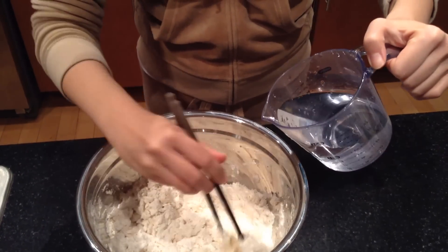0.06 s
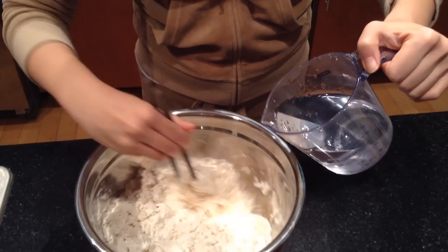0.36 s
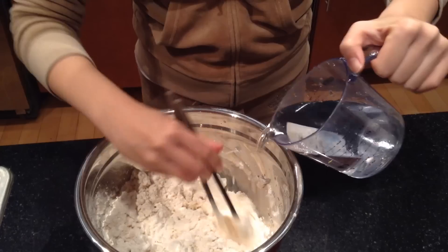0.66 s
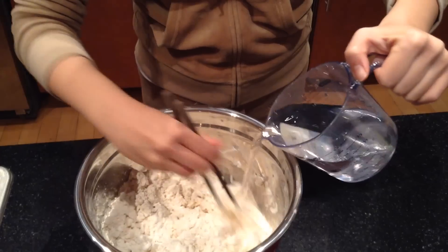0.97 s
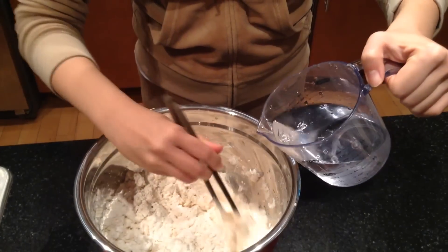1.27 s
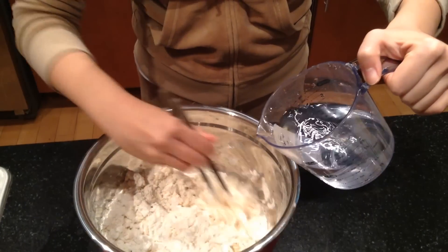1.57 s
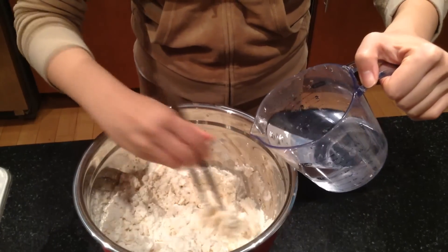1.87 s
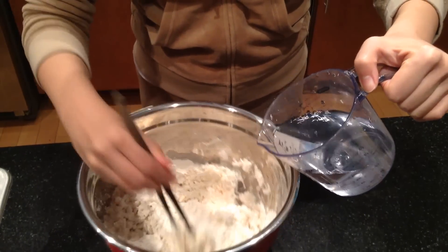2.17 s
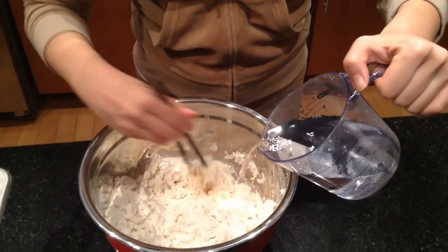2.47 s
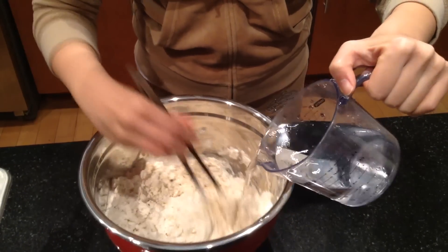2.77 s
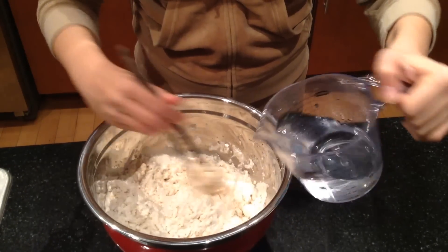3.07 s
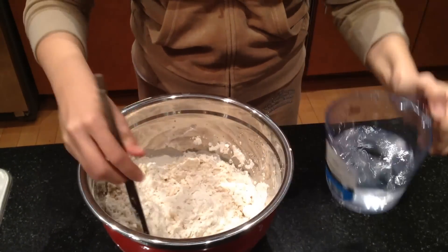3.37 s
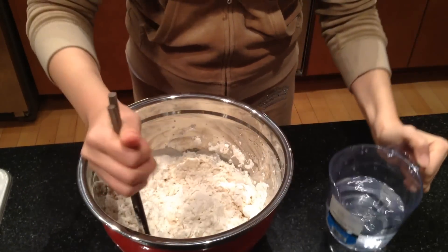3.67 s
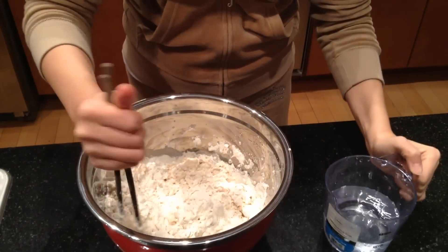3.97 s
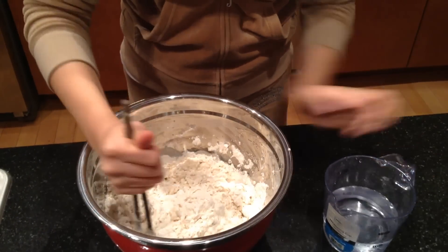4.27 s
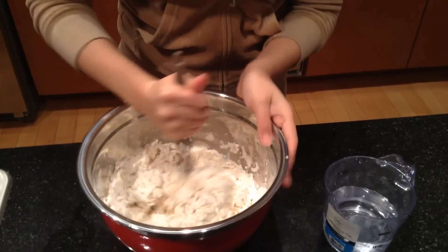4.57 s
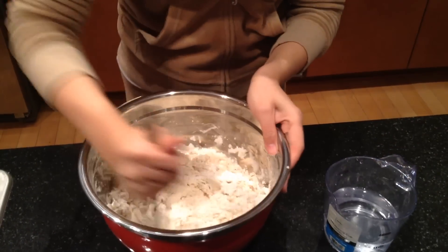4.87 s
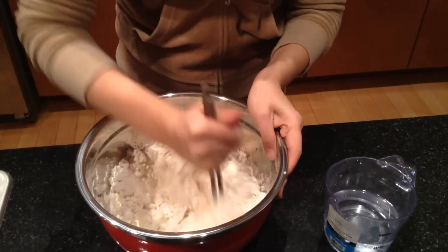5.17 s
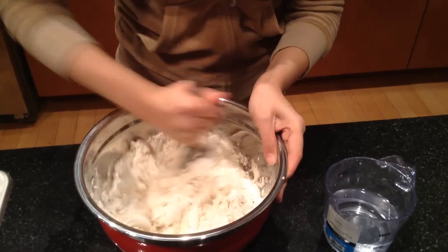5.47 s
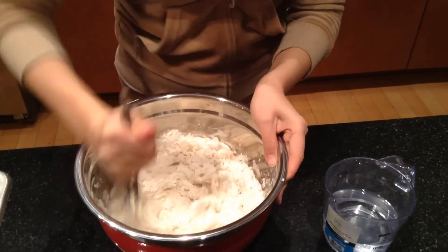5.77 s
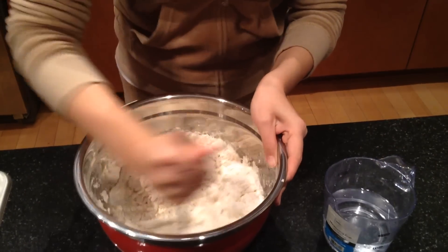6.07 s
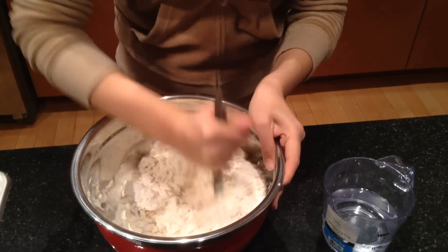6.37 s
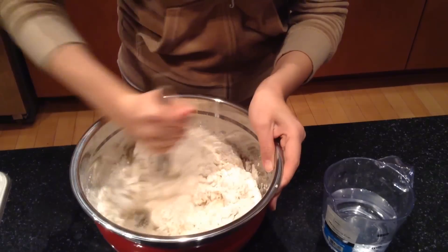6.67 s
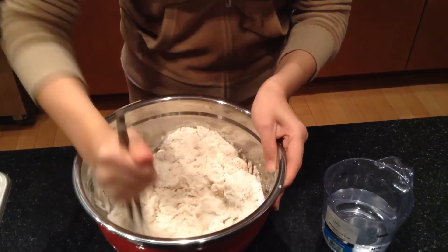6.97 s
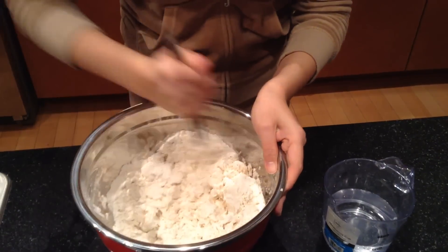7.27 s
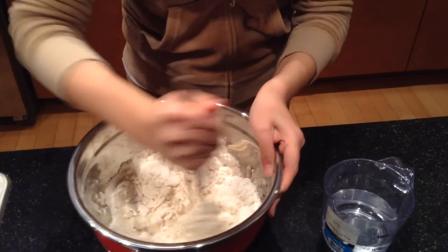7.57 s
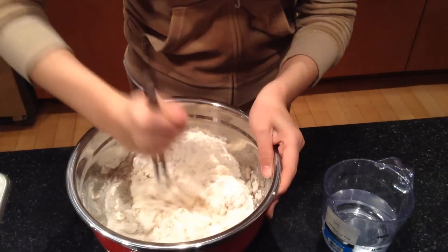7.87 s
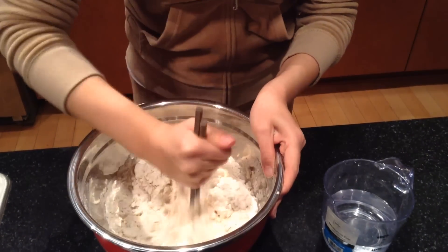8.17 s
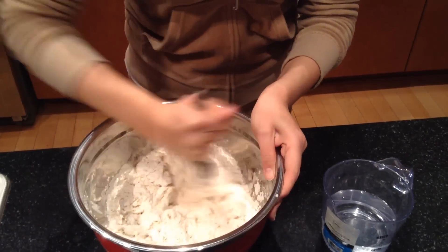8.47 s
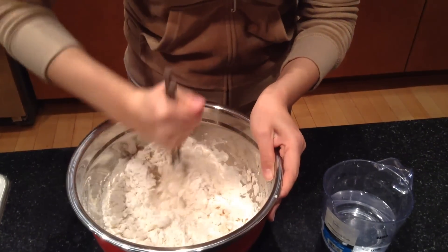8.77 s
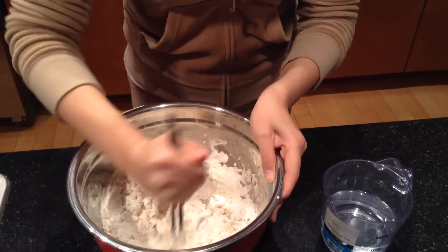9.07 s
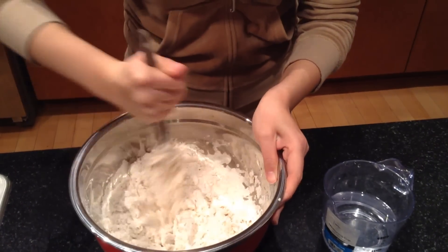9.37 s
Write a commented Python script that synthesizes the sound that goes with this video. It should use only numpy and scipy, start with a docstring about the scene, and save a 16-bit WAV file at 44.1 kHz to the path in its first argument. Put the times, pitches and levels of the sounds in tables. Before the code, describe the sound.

Chopsticks stir damp flour in a steel bowl, swishing, scraping and clicking, with a few knocks that briefly ring the rim. About four seconds in, a plastic jug clatters down on a stone counter. The stirring then grows harder, with louder, duller knocks and thumps as the bowl rocks. It sounds close, in a quiet kitchen with a slight echo and a soft appliance hum.

```python
"""In a quiet kitchen, chopsticks stir flour and water in a steel bowl on a stone counter.
Each stroke swishes through the crumbs, and many end in a knock that rings the bowl and rocks it.
The sticks click and squeak, and wet dough rumbles. A plastic jug clatters down; the freed hand
slides onto the bowl and holds it, which damps the rim, and the strokes grow harder.
Behind it all, an appliance hums softly."""
import sys
import numpy as np
from scipy import signal
from scipy.io import wavfile

SR = 44100
rng = np.random.default_rng(int(sys.argv[2]) if len(sys.argv) > 2 else 0)


def wav_out(sig):
    """Save sig, one row per channel (or a flat mono array), as 16-bit PCM at SR to the path in sys.argv[1]."""
    wavfile.write(sys.argv[1], SR, np.round(np.clip(np.atleast_2d(sig).T, -1, 1) * 32767).astype(np.int16))


N = 425124
TIME = np.arange(N) / SR
AGE = TIME[:SR * 3 // 4]  # seconds since a blow
HOLD_S = 4.6  # from here on, a hand holds the bowl

# Levels in the tables are relative: the functions turn whole layers up or down.
# Quick jabs into the flour. Each row: start in seconds, flour swish in dB, rasp on the steel in dB.
JABS = [(0.023, -52, -54), (0.646, -51.5, -51), (0.88, -68, -57), (1.022, -50, -64), (1.262, -57, -59),
        (1.553, -60, -58), (1.862, -54, -56), (2.465, -58, -55), (2.731, -55, -53), (7.413, -57, -65),
        (8.166, -52.5, -61), (8.876, -59, -71), (9.238, -57, -69), (9.538, -55.5, -61)]
# Sweeps round the bowl. Each row: fastest moment and length in seconds, swish and rasp in dB.
SWEEPS = [(0.38, 0.43, -57.5, -61), (0.687, 0.22, -67, -60), (1.044, 0.44, -56, -60),
          (1.334, 0.34, -57, -63), (1.63, 0.41, -57.5, -59), (1.92, 0.24, -71, -66), (2.188, 0.2, -55, -58),
          (2.32, 0.26, -63, -67), (2.53, 0.23, -64, -65), (2.803, 0.31, -57, -57), (3.047, 0.26, -61, -68),
          (3.197, 0.28, -55, -73), (3.655, 0.18, -64, -70), (4.343, 0.3, -60, -62), (4.582, 0.34, -54, -68),
          (4.876, 0.14, -59, -50), (5.017, 0.39, -53.5, -50.5), (5.484, 0.58, -56.5, -55),
          (5.903, 0.36, -52, -48), (6.07, 0.28, -59.5, -65), (6.315, 0.36, -53, -51),
          (6.638, 0.11, -59, -50), (6.72, 0.5, -52, -50), (7.123, 0.24, -49, -48), (7.46, 0.16, -59.5, -69),
          (7.55, 0.12, -55.5, -68), (7.635, 0.2, -59, -57), (7.92, 0.31, -59, -64), (8.29, 0.14, -60, -66),
          (8.615, 0.25, -57.5, -62), (8.99, 0.24, -63, -69), (9.3, 0.16, -71, -72), (9.61, 0.14, -62, -70)]
# The tone of sliding flour, of tips scraping steel and of a dry stick tick.
# Each row: frequency in Hz, level in dB.
FLOUR_TONE = [(300, -14), (2000, -4), (4000, -4.5), (6500, 7), (8200, 5), (10500, 7.5), (13000, 3),
              (15500, 0)]
RASP_TONE = [(1000, -43), (5200, -24), (6000, -10), (6500, -1), (7000, -3), (7700, -9), (12000, -38)]
TICK_TONE = [(2000, -3.5), (5000, -32), (8300, 10.5), (11500, 6.5), (13300, 2), (15500, -10)]


def flour():
    """Countless crumbs slip past the sticks, and the tips rasp through the flour on the steel."""
    swish_power, rasp_power = np.zeros(N), np.zeros(N)
    jab = np.minimum(AGE / 0.0041, 1) * amp(-180 * AGE)  # rises in about 4 ms, fades 180 dB a second
    for start, swish_db, rasp_db in JABS:
        add(swish_power, start, (amp(swish_db) * jab) ** 2)
        add(rasp_power, start, (amp(rasp_db) * jab) ** 2)
    for fastest, length, swish_db, rasp_db in SWEEPS:
        stroke = sweep(fastest, length)
        swish_power += (amp(swish_db) * stroke) ** 2
        rasp_power += (amp(rasp_db) * stroke) ** 2
    light = TIME < HOLD_S  # light strokes tick through loose crumbs
    crumbs = amp(-1 - 1.3 * light) * colour(slips(per_s=10000, spread_db=0), FLOUR_TONE)
    grit = amp(-8) * light * colour(slips(per_s=120, spread_db=6.5), TICK_TONE)
    rasp = amp(-8) * colour(slips(per_s=2000, spread_db=1.5), RASP_TONE)
    return np.sqrt(swish_power) * (crumbs + grit) + np.sqrt(rasp_power) * rasp


def sweep(fastest_s, length_s):
    """The loudness of one stroke: it gathers speed, then slows more gently."""
    rise_share, ends_db, roundness = 0.41, -16.5, 1.08
    before = (fastest_s - TIME) / rise_share
    after = (TIME - fastest_s) / (1 - rise_share)
    away = np.maximum(before, after) / length_s  # 0 at the peak, 1 at either end
    return amp(ends_db * away ** roundness) * (away < 2)


# The sticks hit the bowl. Each row: start in seconds, then the levels in dB of
# the wall's clack, the deep thump, the upper thump, the rim's ring and the tip's click.
KNOCKS = [(0.024, -53, -47, -53, -74, -64), (0.645, -34.5, -42, -45.5, -62, -51),
          (0.878, -49.5, -55.5, -58, -81, -62), (1.26, -35.5, -46, -46.5, -45.5, -43),
          (1.559, -54, -61, -66, -69, -61.5), (1.973, -62, -50.5, -60, -72, -73),
          (2.137, -60, -53.5, -59, -67, -65), (2.729, -42, -43, -47, -53.5, -60),
          (4.68, -48.5, -45.5, -45, -56, -60.5), (5.873, -30.5, -31, -36, -66, -71),
          (6.299, -25.5, -29, -30, -44, -48.5), (6.715, -31.5, -31, -38.5, -58, -59),
          (7.103, -21.5, -25.5, -22.5, -48, -42), (7.413, -53, -50, -60, -71, -68),
          (7.555, -45, -72, -53, -49, -58), (7.669, -31, -28.5, -26, -38, -48.5),
          (8.164, -54, -47.5, -50.5, -43, -58.5), (8.597, -56, -49, -51, -71, -67),
          (8.874, -48, -41.5, -42.5, -68, -67), (9.218, -49.5, -46, -47.5, -66, -69)]
# The bowl's own notes. Each row: pitch in Hz, level in dB, seconds to fade by 60 dB if left alone.
BOWL_NOTES = [(184, -17, 0.099), (223, 3.5, 0.07), (262.5, 6, 0.062), (326.3, 6.5, 0.057),
              (374.4, 0, 0.064), (491, 1.5, 0.19), (568, -2.5, 0.48), (795, -8.5, 0.29), (843, -4, 0.06),
              (929, -7, 0.1), (1019, -2.5, 0.053), (1097, -6.5, 0.069), (1353, -11.5, 0.11),
              (1697, -9.5, 0.17), (1976, -4, 0.49), (2044, -6, 0.69), (3147, 2, 0.29), (3180, 0, 0.25),
              (3600, -24, .3), (4010, 2, 0.12), (4700, -24, .3), (5590, -24, .3), (6320, -14, 0.27),
              (6660, -5, 0.17)]
# The tone of the wall's clack and of a tip on steel. Each row: frequency in Hz, level in dB.
CLACK_TONE = [(150, -43), (450, -2), (650, 3), (900, 2.5), (1400, -6.5), (1800, -8.5), (2200, -14.5),
              (5000, -79), (16000, -53)]
TIP_TONE = [(1000, -5.5), (2500, 2), (4300, 3), (5300, 1.5), (6000, 8.5), (6700, 7), (8000, 0.5),
            (11000, -2), (15500, -1)]


def knocks():
    """A blow clacks on the dough-lined wall and rings the bare rim, unless a hand damps it."""
    out = np.zeros(N)
    for start, clack_db, _, _, rim_db, tip_db in KNOCKS:
        held = start > HOLD_S
        # dough on the wall chokes most of the motion at once; a thin ring is left
        choked = amp(-14) * ring(BOWL_NOTES, 450, 1500, damp_db_per_s=1700)
        clack = amp(-17) * burst(CLACK_TONE, fade_s=0.026)
        low_ring = amp(-24.5) * ring(BOWL_NOTES, 450, 1500, damp_db_per_s=40 * held)
        high_ring = amp(-31 + 3.4 * held) * ring(BOWL_NOTES, 1500, 1850)
        wall = amp(clack_db) * (choked + clack + low_ring + high_ring)
        rim = amp(rim_db - 7 - 20 * held) * ring(BOWL_NOTES, 1850, SR, damp_db_per_s=200 * held)
        tip = amp(tip_db + 1) * burst(TIP_TONE, fade_s=0.032)
        add(out, start + 0.00096, kitchen(wall, wet_db=-0.5, build_s=0.0047))
        add(out, start + 0.001, kitchen(rim + tip, wet_db=-2, build_s=0.004))
    return out


# The tone of a thud on the counter. Each row: frequency in Hz, level in dB.
THUD_TONE = [(30, -18), (75, -55), (115, -11), (170, 4), (330, 4), (600, -4.5), (1200, -16.5), (2000, -16),
             (8000, -45.5)]
# The first echoes of a thump. Each row: delay in seconds, level in dB.
ECHOES = [(.019, -15), (0.022, -7.5)]


def thumps():
    """Each knock rocks the loaded bowl on the counter; the nearest surfaces return the thump."""
    out = np.zeros(N)
    for start, _, deep_db, upper_db, _, _ in KNOCKS:
        deep = ring(BOWL_NOTES, 0, 290, rise_s=0.0079) + amp(-13.5) * burst(THUD_TONE, fade_s=0.25)
        upper = ring(BOWL_NOTES, 290, 450, rise_s=0.0061)
        thump = amp(deep_db - 1) * deep + amp(upper_db - 3) * upper
        add(out, start + 0.001614, kitchen(thump, wet_db=-13.5, build_s=0.012))
        for delay, db in ECHOES:
            add(out, start + delay + rng.normal(0, 0.00053), amp(db) * thump)
    return out


# The sticks click and catch. Each row: start in seconds, then tick, squeak and wood levels in dB.
CLICKS = [(0.3116, -55, -50, -64), (0.9587, -51, -53, -62), (1.0266, -37.5, -58, -58),
          (1.063, -47, -53, -53), (1.325, -43, -60, -66), (1.191, -49, -65, -59), (1.559, -56, -48, -65),
          (1.862, -49, -54, -65), (2.0077, -53, -72, -70), (2.1834, -49, -52, -61), (2.4628, -50, -54, -66),
          (2.7902, -42, -54, -47.5), (3.0285, -51, -61, -56), (3.1822, -44, -55, -58),
          (3.2325, -43, -71, -72), (3.3168, -45.5, -74, -57), (3.5428, -39, -44.5, -42),
          (4.8412, -54, -49, -58), (6.068, -49, -62, -64), (7.1618, -41, -42, -45), (7.6145, -49, -46, -58),
          (7.634, -50, -48, -59)]
# The tone of a stick's wooden body. Each row: frequency in Hz, level in dB.
WOOD_TONE = [(800, -47), (2500, 15), (3800, 19.5), (5500, 22.5), (8000, -33), (16000, -36)]


def clicks():
    """The sticks tick against each other and squeak as a tip catches on the steel."""
    out = np.zeros(N)
    for start, tick_db, squeak_db, wood_db in CLICKS:
        tick = amp(tick_db - 13.5) * burst(TICK_TONE, fade_s=0.022)
        squeak = amp(squeak_db - 9) * burst(RASP_TONE, fade_s=0.05)
        wood = amp(wood_db - 10) * burst(WOOD_TONE, fade_s=0.045)
        add(out, start, tick + squeak + wood)
    return out


# The jug lands, rocks and settles.
# Each row: start in seconds, then clatter, thud, hollow ring and crack levels in dB.
JUG_HITS = [(3.9624, -24.5, -33, -41.5, -44.5), (3.984, -25.5, -48, -39.5, -41),
            (4.1254, -25.5, -43, -36, -35.5)]
# The jug's own notes. Each row: pitch in Hz, seconds to fade by 60 dB if left alone,
# level in dB as it lands, level in dB as it settles on its other edge.
JUG_NOTES = [(227, 0.091, -10, -3), (312, 0.075, 2, 2), (487, 0.53, -8, -10), (655, 0.34, -9, -5),
             (924, 0.22, 1, -12), (1017, 0.28, -12, -9.5), (1088, 0.13, -8.5, -5.5), (2180, 0.33, -2, -12),
             (2157, 0.27, -1, 0), (2452, 0.14, 4, 4.5), (2640, 0.24, -17, 1), (2700, .33, -4, 4),
             (3320, 0.24, 1.5, -2), (3270, .4, -5, -15), (3400, 0.14, -6, -1), (3690, 0.079, -9, 9),
             (3890, 0.16, -13, 5.5), (4400, 0.36, -10, -20), (4985, 0.82, -14, -3), (5100, 0.57, -3, -4.5),
             (5700, 0.54, -25, -3), (6730, 0.43, -9, -7.5)]
# The tone of the jug's clatter and of its crack. Each row: frequency in Hz, level in dB.
CLATTER_TONE = [(500, -5), (1700, -13), (2400, -7), (3000, -2), (3550, 1), (4300, -7.5), (5100, 0.5),
                (6200, -17), (9000, -26), (16000, -63)]
CRACK_TONE = [(3000, -31), (6000, 1), (6900, 8), (7700, -2), (8700, 7.5), (10200, -3), (11400, 5),
              (13000, -8), (15500, -24)]


def jug():
    """Hard plastic meets stone: the filled jug thuds, its wall rings and there is a bright crack."""
    out = np.zeros(N)
    for start, clatter_db, thud_db, hollow_db, crack_db in JUG_HITS:
        settling = start == JUG_HITS[-1][0]
        notes = [(hz, settle_db if settling else land_db, fade_s)
                 for hz, fade_s, land_db, settle_db in JUG_NOTES]
        thud = amp(-0.5) * burst(THUD_TONE, fade_s=0.13) + amp(-10.5) * ring(notes, 0, 800)
        # the counter soaks up most of the wall's motion at once; a thin ring is left
        choked = amp(-11.5) * ring(notes, 1500, SR, damp_db_per_s=1300)
        clatter = amp(-13) * burst(CLATTER_TONE, fade_s=0.055)
        wall = choked + clatter + amp(-20) * ring(notes, 1500, SR)
        hollow = amp(-3.5) * ring(notes, 800, 1500, damp_db_per_s=160)
        body = amp(thud_db) * thud + amp(clatter_db) * wall + amp(hollow_db) * hollow
        crack = amp(crack_db - 4) * burst(CRACK_TONE, fade_s=0.032)
        add(out, start, kitchen(body, wet_db=-4.5, build_s=0.005))
        add(out, start, kitchen(crack, wet_db=-6.5, build_s=0.0089))
    return out


# Shoves of the dough. Each row: start in seconds, length in seconds, level in dB.
SHOVES = [(1.843, 0.15, -57), (2.124, 0.36, -64.5), (4.478, 0.24, -59.5), (4.838, 0.19, -61),
          (7.444, 0.15, -59.5), (9.475, 0.098, -55.5)]
# The dull tone of moving dough. Each row: frequency in Hz, level in dB.
DOUGH_TONE = [(60, -5.5), (150, -1), (280, 2.5), (450, -3.5), (1000, -9.5), (2200, -12.5), (4000, -23),
              (12000, -22)]


def dough():
    """Wet dough rumbles softly as it is pushed over the bottom of the bowl."""
    push = sum(amp(db) * np.sin(np.pi * np.clip((TIME - start) / length, 0, 1))
               for start, length, db in SHOVES)
    return push * colour(rng.standard_normal(N), DOUGH_TONE)


def hand_slide():
    """A hand rubs along the steel and makes the bowl's high notes sing faintly."""
    rub = slips(per_s=5000, spread_db=1.5)
    singing = sum(amp(-2.5 * np.log2(hz / 3000)) * resonate(rub, hz, width_hz=39)
                  for hz, _, _ in BOWL_NOTES if hz > 2600)
    motion = amp(-50.5) * sweep(fastest_s=4.585, length_s=0.23)
    return motion * (amp(-4) * evened(singing) + amp(-6) * colour(rub, TIP_TONE))


# The notes of an appliance's hum. Each row: pitch in Hz, width in Hz, level in dB.
HUM_NOTES = [(235.4, 6.8, -64), (364.6, 27, -73), (1327, 7, -76)]
# The tone of the room's air. Each row: frequency in Hz, level in dB.
AIR_TONE = [(25, -10), (54, -14), (110, -6.5), (170, -7), (240, -5), (290, -5), (640, -10.5), (1100, -13),
            (1550, -13.5), (4000, -19), (6700, -21), (11200, -23.5), (15000, -27.5)]


def background():
    """An appliance hums over the steady hush of the room."""
    hum = sum(amp(db) * resonate(rng.standard_normal(N), hz, width) for hz, width, db in HUM_NOTES)
    hum = signal.sosfilt(signal.butter(2, 150, "high", fs=SR, output="sos"), hum)
    return hum + amp(-60) * colour(rng.standard_normal(N), AIR_TONE)


# How long the kitchen echoes. Each row: frequency in Hz, seconds to fade by 60 dB.
ROOM_FADES = [(150, 0.67), (500, 0.45), (2000, 0.63), (6000, 0.5), (14000, 0.31)]


def kitchen(x, wet_db, build_s):
    """Adds echoes from cupboards and walls, at wet_db: they swell, then each band fades at its own pace."""
    hz, t, bands = signal.stft(rng.standard_normal(len(AGE)), SR, nperseg=256)
    fade = amp(-60 * t / read(ROOM_FADES, hz)[:, None])
    tail = signal.istft(bands * fade, SR, nperseg=256)[1][:len(AGE)]
    tail *= 1 - np.exp(-AGE / build_s)
    return x + amp(wet_db) * signal.fftconvolve(x, tail / np.linalg.norm(tail))[:len(x)]


def ring(notes, low_hz, high_hz, rise_s=0.0005, damp_db_per_s=0):
    """A struck object's notes between low_hz and high_hz, each a fading sine wave."""
    sines = 0
    for hz, db, fade_s in notes:
        phase = rng.uniform(0, 2 * np.pi) * (hz > 450)  # the lowest notes all start with the push
        if low_hz <= hz < high_hz:
            level = amp(db - AGE * (60 / fade_s + damp_db_per_s))
            sines += level * np.sin(2 * np.pi * hz * AGE + phase)
    return struck(sines * (1 - np.exp(-AGE / rise_s)))


def burst(tone, fade_s):
    """Many short-lived notes blur into a puff of noise that drops 60 dB in fade_s."""
    return struck(colour(rng.standard_normal(len(AGE)) * amp(-60 * AGE / fade_s), tone))


def slips(per_s, spread_db):
    """Friction as tiny random slips; more spread makes a few of them stand out."""
    size = amp(spread_db * np.minimum(rng.exponential(1, N), 5))
    return evened(size * rng.standard_normal(N) * (rng.random(N) < per_s / SR))


def resonate(x, hz, width_hz):
    """Lets x excite one note; the narrower the width, the purer it sounds."""
    pole = np.exp((2j * np.pi * hz - np.pi * width_hz) / SR)
    return evened(signal.lfilter([1], [1, -pole], x).real)


def colour(x, tone):
    """Filters x to follow a tone table, at an average level of 1."""
    size = 2048
    log_gain = np.log(amp(read(tone, abs(np.fft.fftfreq(size, 1 / SR)))))
    # minimum phase: the filter never sounds ahead of its input
    response = np.fft.ifft(np.exp(np.conj(signal.hilbert(log_gain)))).real
    return evened(signal.oaconvolve(x, response[:size // 2])[:len(x)])


def read(table, hz):
    """Looks up a value between a table's rows, on a log-frequency scale."""
    row_hz, values = np.transpose(table)
    return np.interp(np.log(hz + 1), np.log(row_hz), values)


def amp(db):
    """Turns decibels into a gain."""
    return 10 ** (np.asarray(db) / 20)


def evened(x):
    """Scales x to an average (rms) level of 1."""
    return x / np.sqrt(np.mean(x ** 2) + 1e-20)


def struck(x):
    """Scales a blow so that its first 20 ms have an average (rms) level of 1."""
    return x / np.sqrt(np.mean(x[:SR // 50] ** 2) + 1e-20)


def add(mix, start_s, sound):
    """Mixes a sound in at start_s."""
    part = mix[max(round(start_s * SR), 0):][:len(sound)]
    part += sound[:len(part)]


def scene():
    """Bowl, jug and kitchen together, in one channel."""
    stirring = kitchen(clicks() + flour() + dough() + hand_slide(), wet_db=-4.5, build_s=0.0063)
    return (thumps() + knocks() + stirring + jug() + background())[None]


def record(dry):
    """A small microphone loses the deep bass; the highest treble is cut too."""
    thin = signal.sosfilt(signal.butter(2, 145, "high", fs=SR, output="sos"), dry)
    treble_cut = signal.firwin(611, 15400, window=("kaiser", 8), fs=SR)
    return signal.oaconvolve(thin, treble_cut[None], "same")


dry = scene()
out = record(dry)
wav_out(out)
```